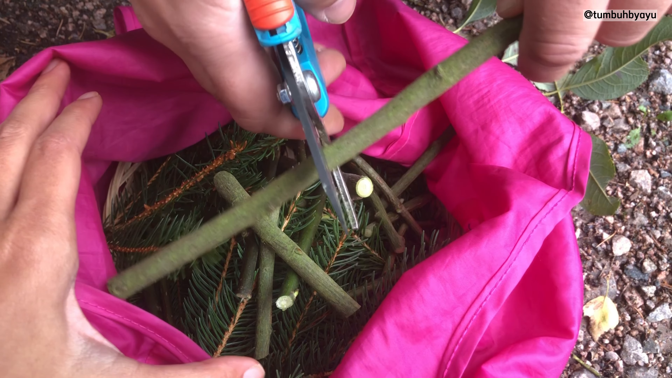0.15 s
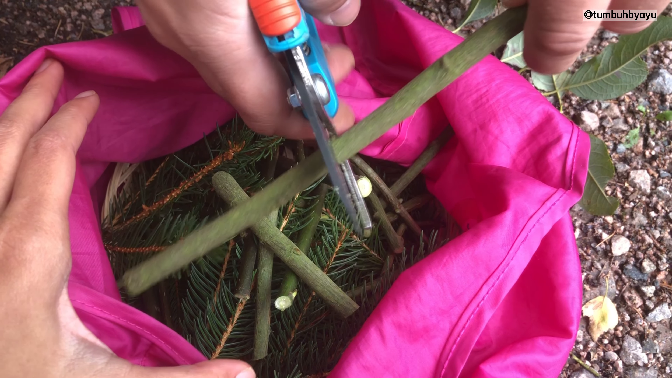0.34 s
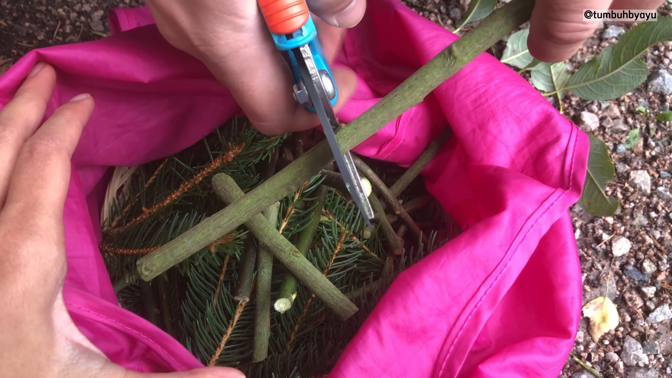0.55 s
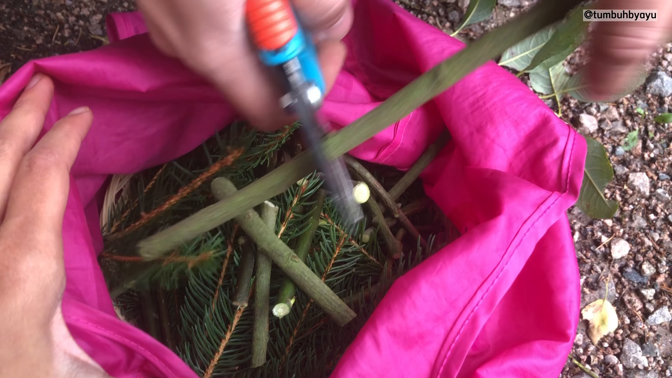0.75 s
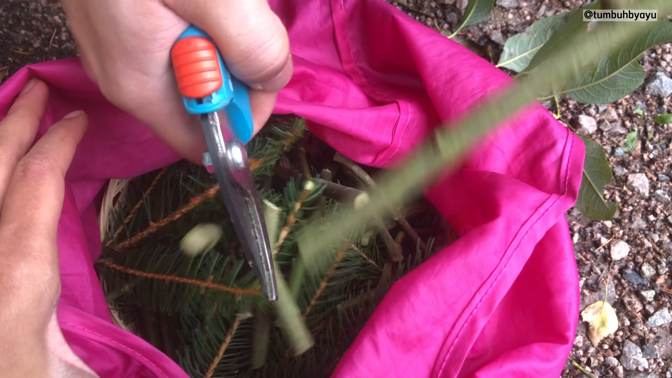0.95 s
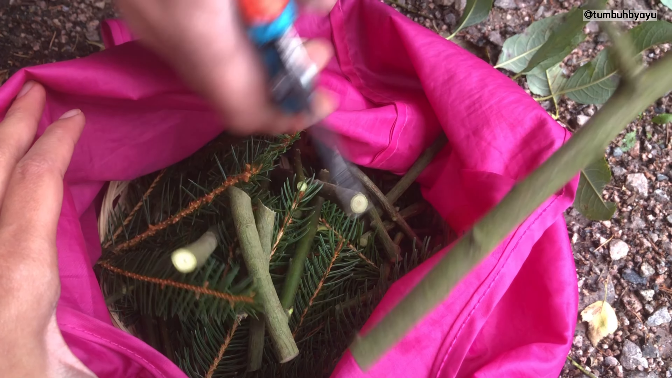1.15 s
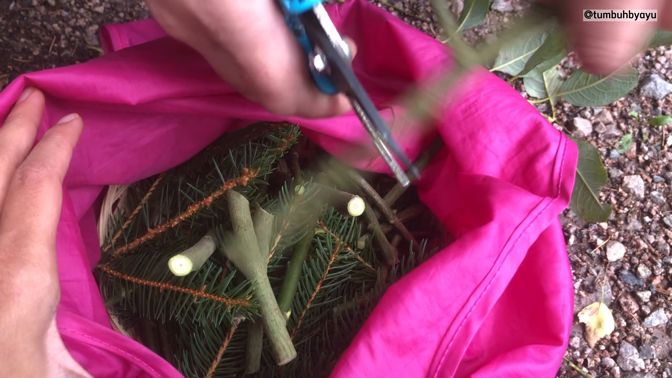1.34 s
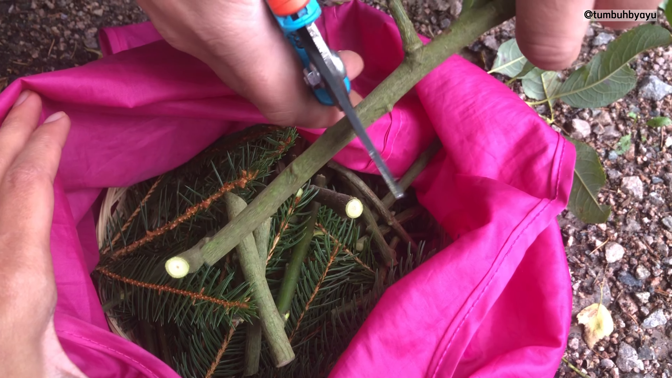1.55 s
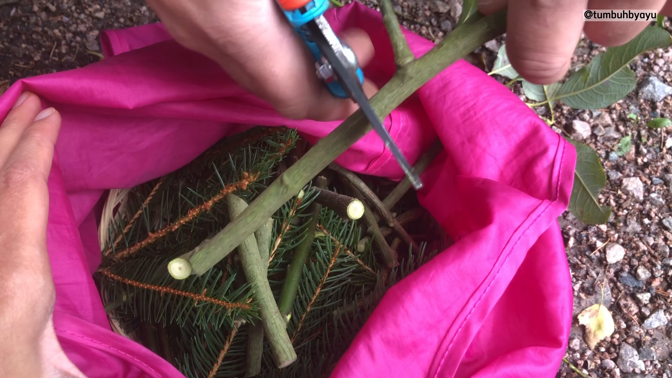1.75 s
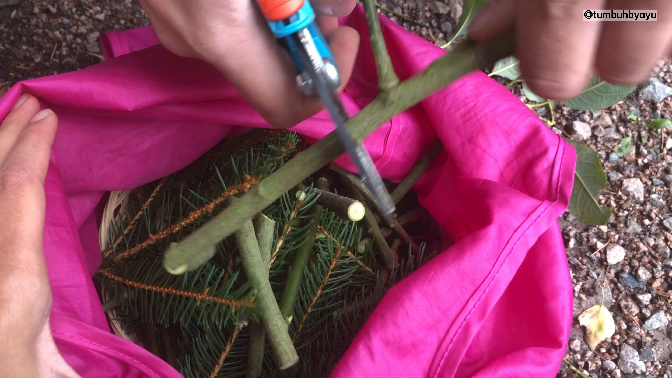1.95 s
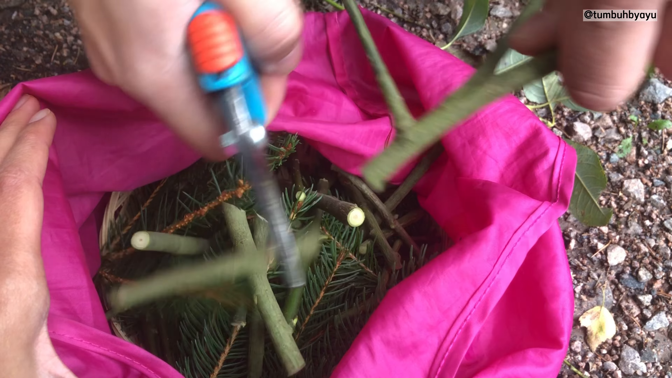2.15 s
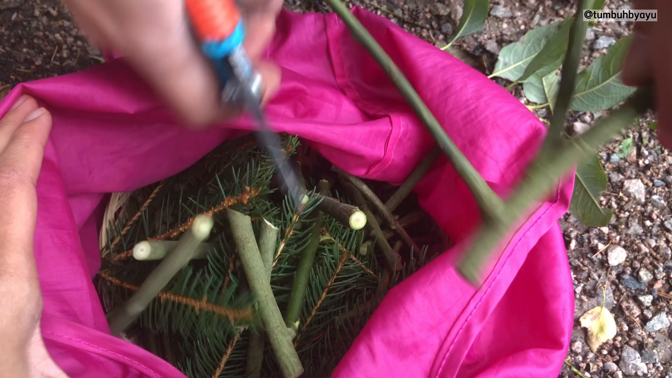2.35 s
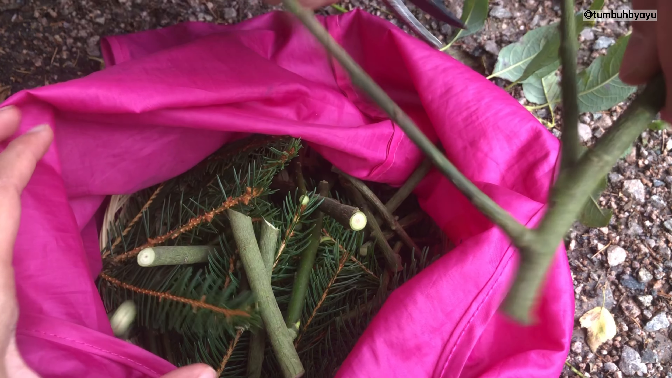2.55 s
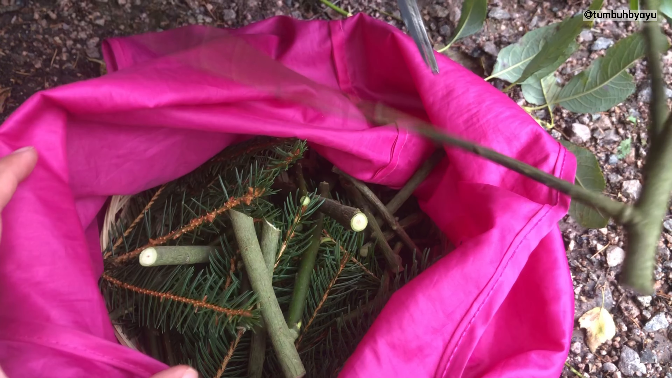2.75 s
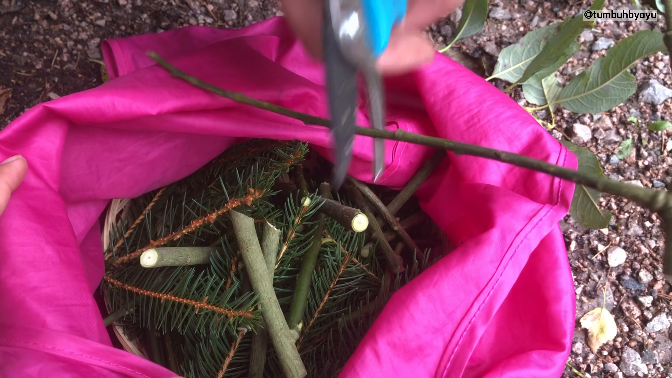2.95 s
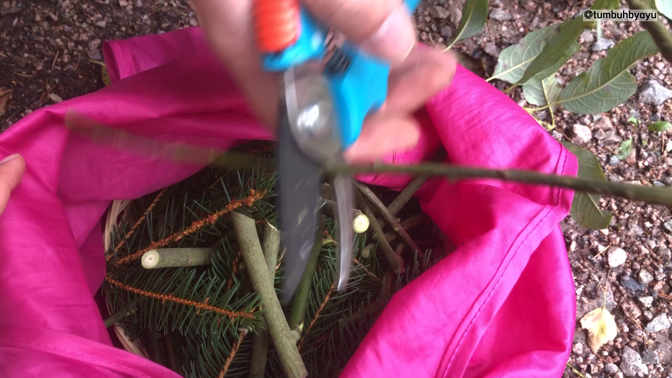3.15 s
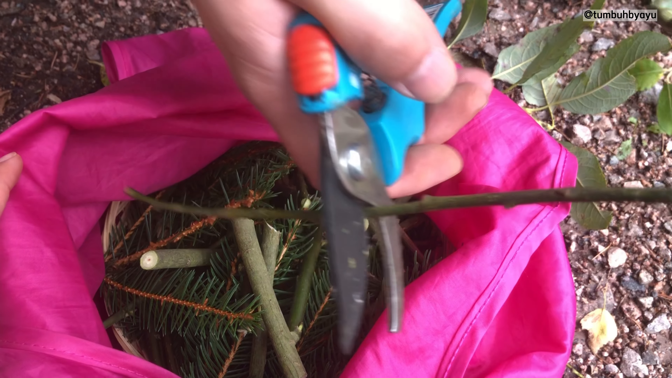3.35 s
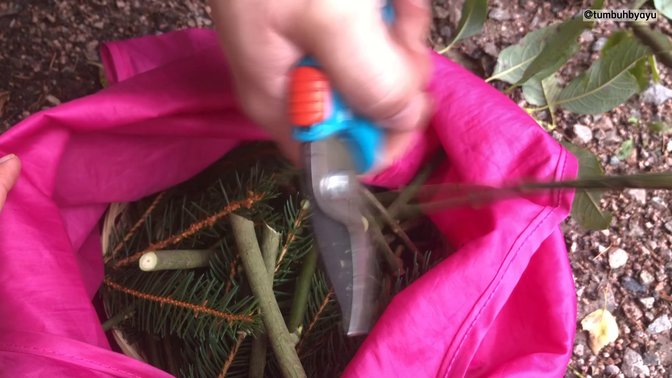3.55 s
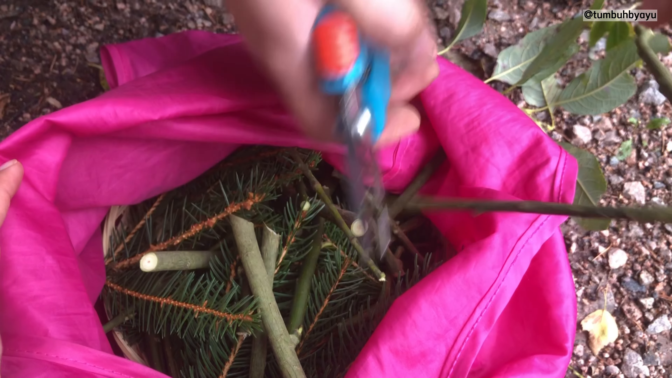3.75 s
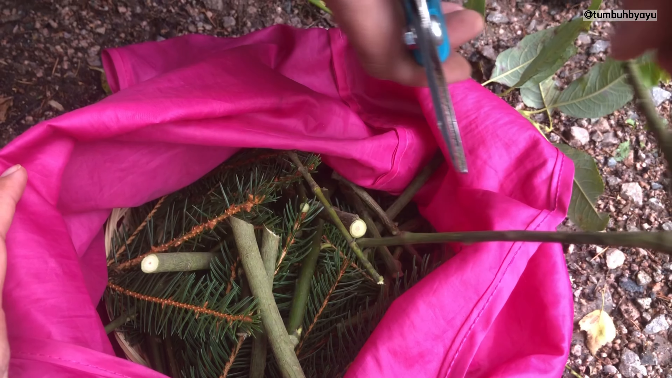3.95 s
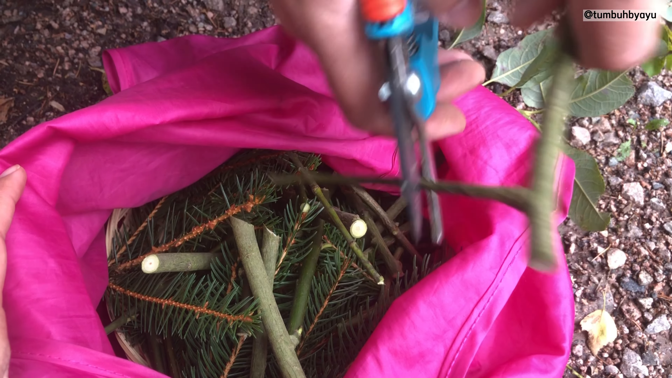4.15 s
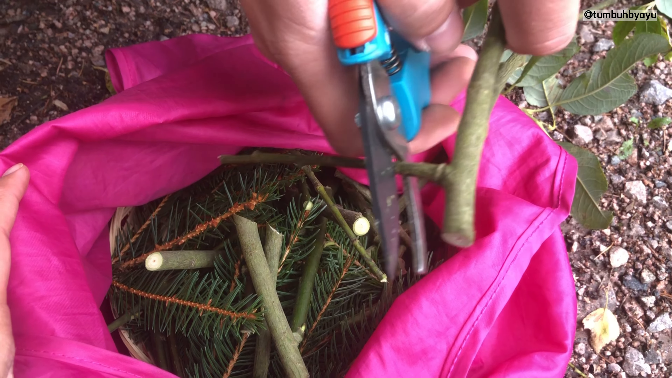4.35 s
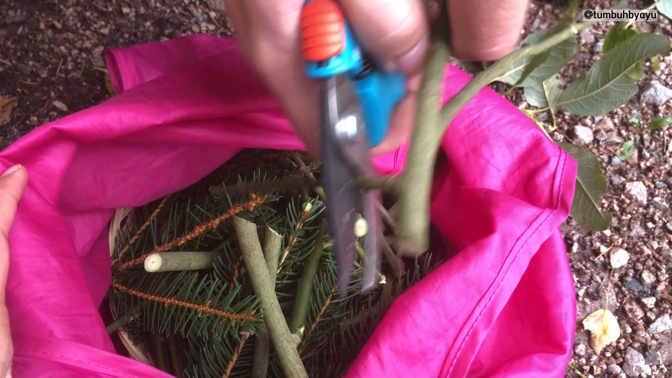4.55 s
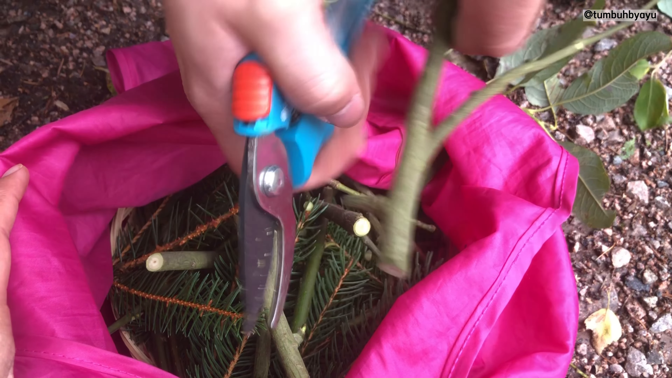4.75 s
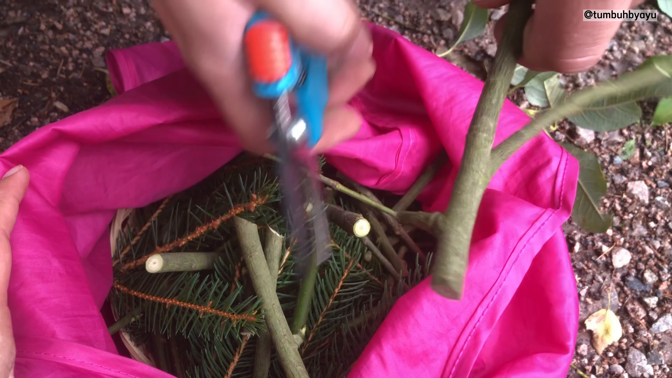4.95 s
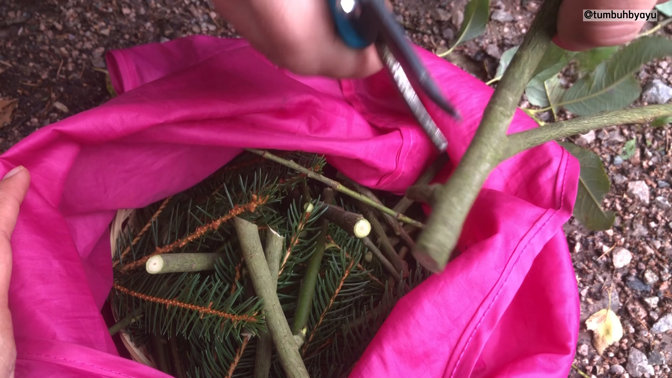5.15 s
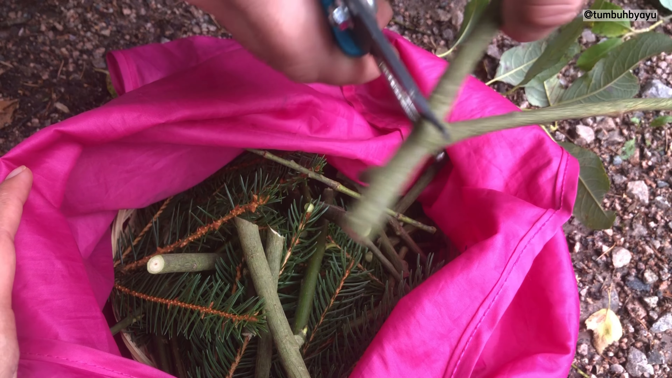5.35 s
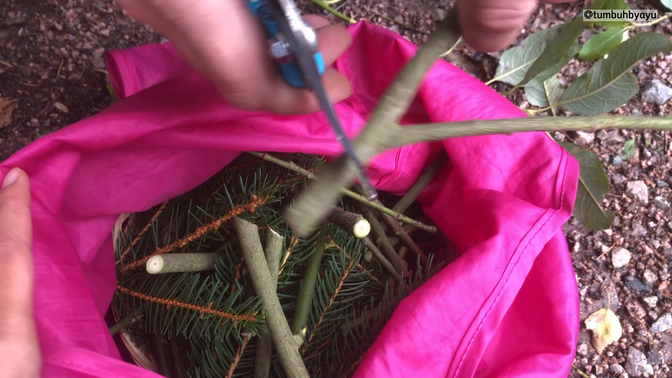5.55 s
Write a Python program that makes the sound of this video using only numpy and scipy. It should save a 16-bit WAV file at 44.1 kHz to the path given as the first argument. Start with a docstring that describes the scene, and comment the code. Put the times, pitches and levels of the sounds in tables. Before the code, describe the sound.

Close-up pruning: four crisp, fibrous snips spaced over a few seconds, with scattered twig clicks, rustling fabric and a faint low outdoor rumble.

```python
"""Pruning shears over a cloth bag

Hand pruning shears snip four green stems over a cloth bag outdoors, heard from close by.
Each cut tears the fibres in bright noise bursts; struck modes then give the snap and a brief ring.
Twigs and opening shears tick as pitched noise bursts; cloth and needles rustle as grains and hiss.
A low outdoor rumble of shaped noise lies underneath."""
import sys
import numpy as np
from scipy import signal
from scipy.fft import rfft, irfft
from scipy.io import wavfile
from scipy.ndimage import uniform_filter1d

SR = 44100
rng = np.random.default_rng(int(sys.argv[2]) if len(sys.argv) > 2 else 0)


def waveform_to_disk(signal):
    """Save audio, clipped to [-1, 1], as 16-bit WAV at the path in sys.argv[1]."""
    frames = np.transpose(np.atleast_2d(signal))
    scaled = np.clip(frames, -1, 1) * 32767
    samples = np.round(scaled).astype(np.int16)
    wavfile.write(sys.argv[1], SR, samples)


N = 246959  # length [samples]


def undb(db):
    """Decibel law: amplitude gain is ten to the power of level over twenty."""
    return 10 ** (np.asarray(db) / 20)


def band(x, lo_hz, hi_hz):
    """Band-pass filtering: gentle slopes on either side of the passband."""
    return signal.sosfilt(signal.butter(2, [lo_hz, hi_hz], "bandpass", fs=SR, output="sos"), x)


def unit(x):
    """Power normalisation: scales a signal to rms 1."""
    return x / np.sqrt(np.mean(x ** 2))


def peak(x, db):
    """Peak normalisation: scales a signal to a given peak level."""
    return x * undb(db) / np.abs(x).max()


def fade(t, t60):
    """Exponential decay: the level falls 60 dB in t60 seconds (at least 1 ms)."""
    return np.exp(-np.log(1000) * t / max(t60, 1e-3))


def swell_fade(s, db, swell, t60):
    """Exponential growth and decay: gain rises up to the moment s, then dies away."""
    t = np.arange(N) / SR - s
    growth = np.exp(np.minimum(t, 0) / max(swell, 1e-3))
    return undb(db) * growth * fade(np.maximum(t, 0), t60)


def add(out, s, x):
    """Superposition: mixes x into out from s seconds on."""
    i = int(s * SR)
    out[i:i + len(x)] += x[:len(out) - i]


def walk(rate):
    """Slow random modulation: levels drawn at rate [Hz], smoothed into ramps, with rms 1."""
    k = int(SR / rate)
    held = np.repeat(rng.standard_normal(N // k + 1), k)
    return unit(uniform_filter1d(held, k)[:N])


def tilted(colour_db, step_db):
    """Spectral tilt: tips band levels about the middle by step_db a band."""
    steps = np.arange(len(colour_db)) - (len(colour_db) - 1) / 2
    return np.array(colour_db) + step_db * steps


def grit(share, grain_db, hiss_db):
    """Impulsive friction noise: tiny clicks of very uneven size over a hiss."""
    struck = rng.random(N) < share
    clicks = struck * rng.standard_normal(N) * undb(grain_db * rng.exponential(size=N))
    return unit(unit(clicks) + undb(hiss_db) * rng.standard_normal(N))


# Spectrum of the outdoor air noise: (frequency [Hz], relative level per hertz [dB])
OUTDOOR_SPECTRUM = [(18, -37), (30, -11.5), (96, 0.5), (190, -1.5), (255, -8.5), (577, -16), (1210, -22.5),
                    (1840, -32.5), (4530, -34.5), (5440, -30), (10500, -39), (15200, -33), (16500, -47.5)]


def outdoors(air_db=-64, waver_db=2.0, hum_hz=157, hum_db=-72):
    """Spectral shaping of noise: a wavering low rumble with faint hiss, and a narrow-band hum."""
    hz, db = np.transpose(OUTDOOR_SPECTRUM)
    log_hz = np.log(np.fft.rfftfreq(N, 1 / SR) + 1)
    colour = undb(np.interp(log_hz, np.log(hz), db))
    air = unit(irfft(rfft(rng.standard_normal(N)) * colour, N))
    hum = unit(band(rng.standard_normal(N), hum_hz - 9, hum_hz + 9))
    return undb(air_db + waver_db * walk(9.6)) * air + undb(hum_db) * hum


def needles(lo_hz=500, hi_hz=15000, cycles=19.0, grain_db=3.0, count=3500):
    """Granular excitation: needles and leaf edges flick as short, decaying pitched grains."""
    out, t = np.zeros(N), np.arange(400) / SR
    for at, pitch, size, length in rng.random((count, 4)):
        hz = lo_hz * (hi_hz / lo_hz) ** pitch  # evenly spread in log frequency
        t60 = cycles * (.4 + 3 * length ** 2) / hz
        grain = np.sin(2 * np.pi * hz * t) * fade(t, t60)
        gain = undb(-grain_db * np.log(size + 0.0069)) * hz / hi_hz  # a few are much louder
        add(out, at * N / SR, gain * grain)
    return unit(out)


# Slow shifting of the bag; the tilt runs from lowest to highest band:
# (time [s], level before band colour [dB], tilt [dB])
BAG_SHIFTS = [(0, -68.5, -13), (.43, -74, -6), (.75, -65.5, 7), (1.24, -78, -10), (1.75, -73, 0),
              (2.0, -64.5, 6), (2.65, -64.5, 2), (2.9, -73, -6), (3.5, -67.5, 7), (3.9, -69.5, 0.5),
              (4.12, -85, 0.5), (4.55, -69, -13), (4.7, -62.5, 0.5), (5.2, -62, 9), (5.27, -72.5, -7),
              (5.6, -57, 5)]
# A hand, a stem or cuttings brushing cloth and needles:
# (time of peak [s], level before band colour [dB], tilt [dB], swell [s], decay t60 [s])
BRUSHES = [(.112, -69.5, 5, 0.036, 0.43), (.396, -64.5, -19, 0.033, 0.12), (.473, -63, -19.5, 0.016, 0.39),
           (.587, -64.5, -6, 0.049, 0.6), (0.916, -47.5, 4.5, 0.029, .5), (1.05, -57, 7, .05, .4),
           (1.182, -61.5, 1, 0.036, 0.12), (1.297, -58.5, -3, 0.011, 0.21), (1.386, -61.5, 2, 0.042, 0.26),
           (1.53, -68.5, -1, .02, 0.43), (1.872, -63, 7, 0.042, 0.24), (1.952, -59, 1, 0.024, 0.24),
           (2.104, -53, -9.5, 0.061, 0.27), (2.198, -55.5, 2, 0.028, 0.38), (2.34, -57, 4, 0.023, 0.47),
           (2.451, -56.5, -9, 0.021, 0.41), (2.612, -56, 1, 0.086, 0.4), (2.775, -56, -2, 0.022, 0.43),
           (2.98, -58.5, 2, 0.049, 0.27), (3.127, -55.5, 7, 0.032, 0.41), (3.39, -60.5, 12.5, 0.025, 0.13),
           (3.589, -55, -7, 0.058, 0.26), (3.69, -58.5, -2, 0.039, 0.19), (3.825, -60, 2, 0.021, 0.26),
           (4.253, -64.5, 3, .015, 0.4), (4.624, -51.5, 10.5, 0.021, .3), (4.665, -56.5, -10, 0.025, 0.19),
           (4.769, -61.5, 8, 0.025, 0.46), (4.93, -59.5, 2, 0.013, 0.66), (5.115, -51, 6, 0.034, 0.19),
           (5.21, -57.5, -2, 0.024, 0.16), (5.31, -63.5, 0, 0.017, 0.61), (5.52, -57, 5, 0.11, 0.77)]
# Centres of the overlapping rustle bands: (frequency [Hz])
RUSTLE_HZ = [300, 900, 2000, 3600, 6000, 9500, 14000]
# Colour of the rubbed cloth and needles at those centres: (level offset [dB])
RUSTLE_COLOUR_DB = [-9.5, -7, -6.5, -3, -6.5, -7.5, -4.5]


def rustle(flutter_db=1.2, quick_db=1.5, needles_db=-5.0, colour_db=1.6):
    """Friction noise in bands: thread and needle grains flutter, and their colour shifts a little."""
    s, *columns = np.transpose(BAG_SHIFTS)
    level_db, tilt_db = (np.interp(np.arange(N) / SR, s, c) for c in columns)
    brush_power = np.array([swell_fade(s, db, swell, t60) for s, db, _, swell, t60 in BRUSHES]) ** 2
    brush_tilt_db = np.array(BRUSHES)[:, 2]

    threads = grit(.1, 1.5, 0)
    flutter = undb(flutter_db * walk(35) + quick_db * walk(170))
    rub = rfft((threads + undb(needles_db) * needles()) * flutter)
    log_hz = np.log(np.fft.rfftfreq(N, 1 / SR) + 1)

    out = 0
    tips = np.linspace(-.5, .5, len(RUSTLE_HZ))
    for share, db, tip in zip(np.eye(len(RUSTLE_HZ)), RUSTLE_COLOUR_DB, tips):
        weight = np.interp(log_hz, np.log(RUSTLE_HZ), share)  # crossfades into its neighbours
        part = unit(irfft(rub * weight, N))
        # bag and brushes add as powers
        bag_power = undb(2 * (level_db + tip * tilt_db))
        gain = np.sqrt(bag_power + undb(2 * tip * brush_tilt_db) @ brush_power)
        out = out + part * gain * undb(db + colour_db * walk(40))
    return band(out, 200, 18000)


# Small ticks: twigs on cloth and metal, and the shears springing open after a cut;
# the lowest band takes the thud level:
# (time [s], level before colour [dB], pitch [Hz], tilt of upper bands [dB per band],
#  ring level [dB], thud relative to level [dB], decay t60 [s])
TICKS = [(0.101, -38.5, 820, 4.5, 9, -18, 0.03), (0.207, -40.5, 902, 2, 7, -15.5, 0.028),
         (0.388, -42, 930, 0, 7, -10, 0.022), (0.459, -36.5, 1230, -0.5, 6, -17, 0.022),
         (0.56, -33, 1600, 5, 0, -16, 0.023), (0.579, -40, 4140, 4, 1, -14, 0.025),
         (0.835, -27, 4370, 1, 8, -14.5, 0.024), (0.927, -31, 4000, 2, 3, -15, 0.023),
         (0.96, -30, 2170, 0.5, 6, -11, 0.022), (0.993, -31, 2900, 5, 14, -16, 0.029),
         (1.018, -38, 3860, 2, 4, -19, 0.025), (1.06, -28, 3750, 3, -1, -15, 0.025),
         (1.29, -27.5, 1000, 2.5, 3, -12, 0.023), (1.36, -41, 2920, 2, 8, -18, 0.032),
         (1.405, -38.5, 2620, 3, 14, -16, 0.034), (1.525, -47.5, 2270, -1.5, 2, -12, 0.028),
         (1.768, -41.5, 1500, -2, -2, -9, 0.029), (1.819, -31, 3930, 7.5, -3, -16.5, 0.03),
         (1.862, -37, 1900, 6, 11, -15, 0.025), (1.925, -37, 1450, 2, 8, -6, 0.028),
         (2.187, -30, 2020, 3.5, 2, -15, 0.025), (2.385, -37.5, 3870, 5.5, 10, -17.5, 0.025),
         (2.54, -40, 644, -2, 8, -11, 0.025), (2.68, -32.5, 5110, 1.5, 4, -15.5, 0.019),
         (2.755, -39.5, 3300, -3, 6, -13, 0.025), (2.767, -35, 2850, 0.5, 9, -11, 0.022),
         (2.93, -37, 1500, -0.5, -2, -14, 0.03), (3.083, -39, 4260, 10, 3, -14, 0.029),
         (3.215, -44, 1300, 1, 2, -13, 0.025), (3.493, -51.5, 2170, 6, 4, -14, 0.025),
         (3.69, -37, 2040, -0.5, 7, -25, 0.028), (3.806, -40, 3580, 3, 14, -14, 0.035),
         (3.839, -38, 3230, 1, 12, -22, 0.031), (3.927, -32, 781, 1, 1, -11.5, 0.029),
         (4.083, -53, 4660, 2.5, 4.5, -13.5, 0.025), (4.244, -38.5, 3310, 2.5, 3, -13, 0.025),
         (4.409, -51, 1290, -3, 3, -13.5, 0.023), (4.661, -35, 921, 5, 10, -13, 0.021),
         (4.741, -43, 3790, -2, 12, -18, 0.025), (4.754, -36.5, 2060, -0.5, 11, -16, 0.03),
         (4.881, -51, 1120, -4, 7, -14, 0.025), (4.957, -43, 3430, 6, 0, -12, 0.025),
         (5.037, -42.5, 1400, -3.5, 1, -16, 0.027), (5.085, -39, 3440, 2, 4, -21, 0.025),
         (5.114, -44, 2420, 1, 8, -17, 0.028), (5.127, -38, 3200, -3.5, 10, -19, 0.025),
         (5.227, -35, 5130, 5, -3, -15, 0.025), (5.365, -40, 775, -3, 4, -16, 0.029),
         (5.517, -35, 2490, 3, 4, -17, 0.023), (5.55, -37, 4590, -3, 7, -17, 0.02)]
# Bands of a tick, thud to crack: (low edge [Hz], high edge [Hz])
TICK_HZ = [(150, 900), (900, 2500), (2500, 7000), (7000, 16500)]
# Colour of the upper three bands of a tick: (level offset [dB])
TICK_COLOUR_DB = [-8, -5.5, -7]


def ticks(grit_db=5.5, contact_t60=0.012, sharp=9.9, pitch_band_db=5.5):
    """Impact and resonance: hard contact and gritty scrape excite the tick's pitch; the bag answers."""
    bag_hz, bag_t60, bag_db = 170, .06, -6  # bag level relative to the thud band
    out, t = np.zeros(N), np.arange(2600) / SR
    draws = rng.standard_normal((len(TICKS), 2, len(t)))
    for row, (hiss, size) in zip(TICKS, draws):
        s, db, hz, tilt_db, ring_db, thud_db, t60 = row
        contact = 1.2 * fade(t, contact_t60)
        push = hiss * undb(grit_db * size) * (fade(t, t60) + contact)
        push[0] = 5  # the first instant of contact
        ring = band(push, hz * (1 - 1 / sharp), hz * (1 + 1 / sharp))
        push = push + undb(ring_db) * ring

        pitch_lift_db = [pitch_band_db * (lo <= hz < hi) for lo, hi in TICK_HZ]
        peaks_db = db + np.r_[thud_db, tilted(TICK_COLOUR_DB, tilt_db)] + pitch_lift_db
        add(out, s, sum(peak(band(push, *edges), p) for edges, p in zip(TICK_HZ, peaks_db)))
        bag = np.sin(2 * np.pi * bag_hz * t) * fade(t, bag_t60)
        add(out, s, undb(peaks_db[0] + bag_db) * bag)
    return out


# Broad rings of the loaded blade: (centre [Hz], width [Hz], level [dB])
BLADE_RINGS = [(4030, 700, -3.5), (7980, 900, -2.5), (14800, 540, 2.5)]


def blade(x):
    """Damped resonance: the broad rings of the loaded blade alone, driven by x."""
    return sum(undb(db) * band(x, hz - width / 2, hz + width / 2) for hz, width, db in BLADE_RINGS)


# Blade creaking into the bark:
# (time of peak [s], level before slip modulation [dB], swell [s], decay t60 [s])
BARK_CREAKS = [(0.575, -58, .015, .5), (1.942, -63, 0.01, 0.18), (2.045, -50, .01, .02),
               (2.37, -62, .15, .04), (.866, -50, .01, .02), (.88, -36, .008, .02)]


def creak(slip_db=5.0):
    """Stick-slip friction: uneven clicks of the edge in the bark sound the blade."""
    gain = sum(swell_fade(*row) for row in BARK_CREAKS)
    return gain * undb(slip_db * walk(50)) * unit(blade(grit(0.032, 4.7, -1)))


# Fibres tearing under the blade; over one swell time the gain grows by e squared:
# (time of peak [s], level before colour [dB], tilt [dB per band], swell [s], decay t60 [s])
FIBRE_TEARS = [(0.8354, -35, 0.5, .003, 0.021), (0.859, -38.5, 3, .003, 0.067), (.865, -42, 2, .004, 0.014),
               (0.8708, -29, 1.5, .001, 0.044), (0.878, -27, 3, .002, 0.083),
               (0.8842, -22.5, 4.5, .004, 0.0097), (0.8883, -20.5, -3, .001, 0.019),
               (0.895, -36, -9, .003, 0.019), (0.9124, -42, 2.5, .004, 0.031),
               (2.047, -28.5, 2, .012, 0.056), (2.0592, -18.5, 2, .004, 0.014),
               (2.0631, -22, -4.5, .001, 0.032), (2.0694, -28, -3, .001, 0.011),
               (2.076, -38.5, 3.5, .003, 0.034), (2.08, -38, 6, .003, 0.054),
               (2.097, -41, 4.5, .006, 0.037), (3.531, -35.5, 3, .003, 0.03),
               (3.5405, -22.5, 3.5, .001, 0.018), (3.5418, -22, 3, 0.00076, 0.016),
               (3.546, -25.5, -1, .001, 0.029), (3.554, -38.5, 2.5, .001, 0.062),
               (3.568, -39.5, -2, .003, 0.03), (4.574, -47, -5, .004, 0.04),
               (4.579, -31.5, 7, 0.00059, 0.008), (4.5811, -24, 5.5, 0.00057, 0.008),
               (4.587, -30, 3.5, 0.0025, .015), (4.5896, -25, 3.5, 0.0015, 0.024)]
# Bands of stem, pith, skin and edge: (low edge [Hz], high edge [Hz])
TEAR_HZ = [(1000, 3000), (3000, 7000), (7000, 11000), (11000, 16300)]
# Colour of stem, pith, skin and edge: (level offset [dB])
TEAR_COLOUR_DB = [-3, 1.5, -3.5, 1]


def tears(crackle_db=7.0, ring_db=-1):
    """Fracture noise: fibres let go in irregular bursts that swell and die; the blade colours them."""
    out, t = np.zeros(N), np.arange(-800, 2400) / SR
    draws = rng.standard_normal((len(FIBRE_TEARS), 2, len(t)))
    for (s, db, tilt_db, swell, t60), (hiss, size) in zip(FIBRE_TEARS, draws):
        envelope = np.where(t < 0, np.exp(2 * t / max(swell, 1e-4)), fade(t, t60))
        push = hiss * undb(crackle_db * size) * envelope
        push = push + undb(ring_db) * blade(push)
        peaks_db = db + tilted(TEAR_COLOUR_DB, tilt_db)
        # filtered twice for steeper band edges
        parts = (peak(band(band(push, *hz), *hz), p) for hz, p in zip(TEAR_HZ, peaks_db))
        add(out, s + t[0], sum(parts))
    return out


# Modes of the shears: (frequency [Hz], relative level in its group [dB], t60 before stretch [s])
SHEAR_MODES = [(80, -2.5, .12), (168, 1.5, 0.04), (502, 1.5, 0.095), (800, 5.5, 0.085),
               (1560, -18.5, 0.0056), (1890, -14, 0.018), (2100, 2.5, 0.011), (2487, -1, 0.0097),
               (3800, 7, 0.0077), (4360, 5.5, 0.0071), (4650, 5, 0.0082), (5610, 3, 0.01),
               (6800, 1.5, 0.0097), (7040, -1, .005), (9400, -1, 0.0064), (11950, 5, 0.0032),
               (13660, -0.5, 0.002), (16600, 1.5, 0.011), (16500, -9, 0.0082)]
# The stem parts and the blades snap shut: (time [s], peak of thump [dB], handles [dB],
#  stem [dB], blades [dB], edge [dB], decay stretch [factor])
SNAPS = [(0.8883, -43.5, -35.5, -33, -14.5, -12, 0.73), (0.8937, -47, -39, -15, -44, -35, 0.33),
         (2.0616, -40, -53, -18, -15, -22.5, 0.85), (2.0658, -45, -28.5, -4, -7.5, -15, 0.54),
         (3.5443, -68, -42.5, -20, -6.5, -6, 0.87), (3.5851, -60.5, -44.5, -29.5, -38, -55, 0.35),
         (4.5814, -72, -70, -33, -26.5, -27, 0.9), (4.5895, -73, -50, -29, -12.5, -14.5, 1)]
# Boundaries between those five groups of modes: (frequency [Hz])
SNAP_HZ = [300, 1000, 3000, 7500]


def snaps(scatter_db=2.5, detune=0.028):
    """Modal synthesis: each hard blow excites the modes with random shifts of level and pitch."""
    out, t = np.zeros(N), np.arange(6000) / SR
    hz, db, t60 = np.transpose(SHEAR_MODES)[:, :, None]
    group = np.digitize(hz[:, 0], SNAP_HZ)
    draws = rng.standard_normal((len(SNAPS), 2, len(SHEAR_MODES), 1))
    for (s, *peaks_db, stretch), (off, size) in zip(SNAPS, draws):
        cycles = hz * (1 + detune * off) * t
        onset = np.minimum(cycles / 1.5, 1)  # each mode builds over one and a half cycles
        decay = np.exp(-np.log(1000) * t / (stretch * t60))
        modes = undb(db + scatter_db * size) * onset * np.sin(2 * np.pi * cycles) * decay
        add(out, s, sum(peak(modes[group == k].sum(0), p) for k, p in enumerate(peaks_db)))
    return out


def scene():
    """Superposition of sources: all are close and dry, with no reflections."""
    return (outdoors() + rustle() + ticks() + creak() + tears() + snaps())[None]


def record(dry):
    """Band limiting: removes the deepest bass, lowers all above 16 kHz, ends steeply at 16.8 kHz."""
    thin = signal.sosfilt(signal.butter(4, 42, "highpass", fs=SR, output="sos"), dry)
    # at least 28 dB down from 16050 Hz
    dull = signal.sosfilt(signal.cheby2(12, 28, 16050, fs=SR, output="sos"), thin)
    return signal.sosfilt(signal.ellip(10, .2, 70, 16800, fs=SR, output="sos"), dull)


dry = scene()
out = record(dry)
waveform_to_disk(out)
```